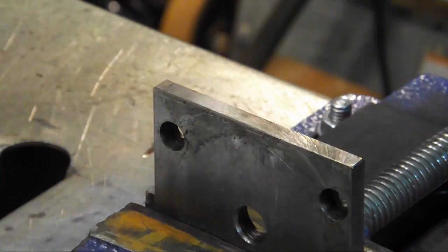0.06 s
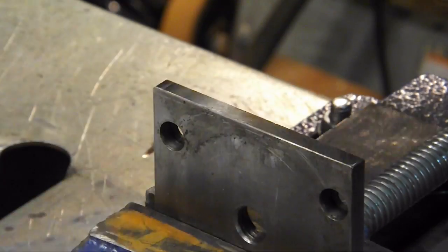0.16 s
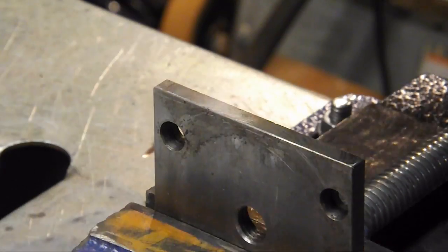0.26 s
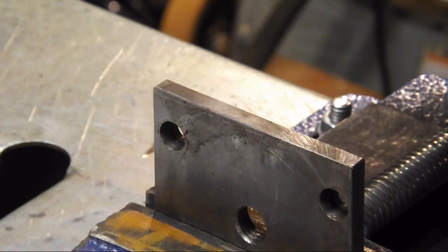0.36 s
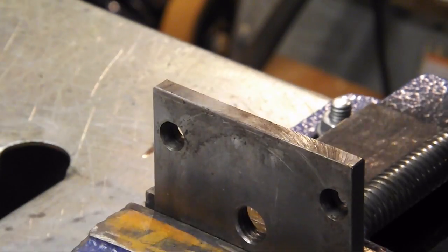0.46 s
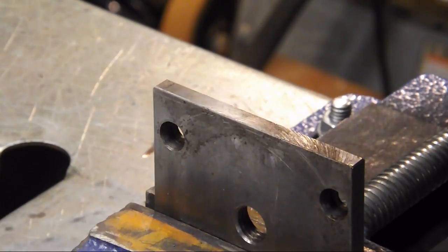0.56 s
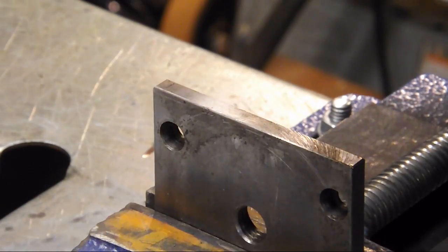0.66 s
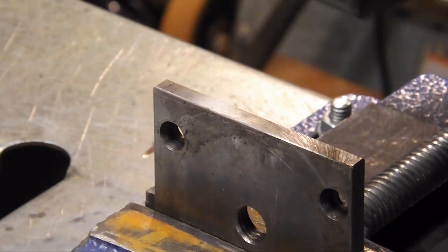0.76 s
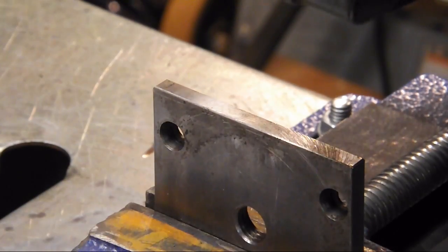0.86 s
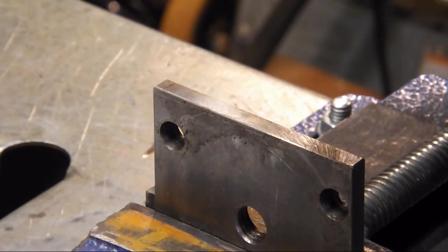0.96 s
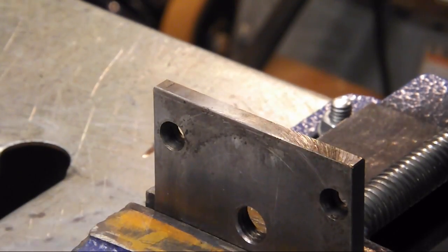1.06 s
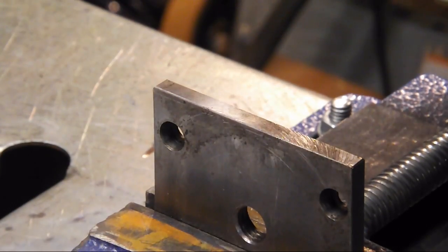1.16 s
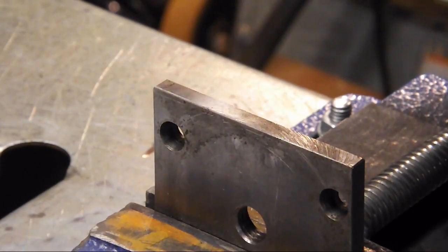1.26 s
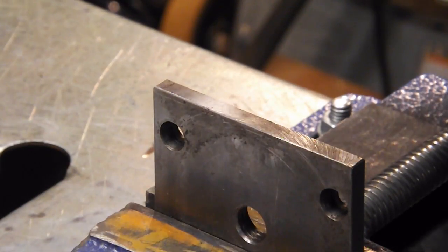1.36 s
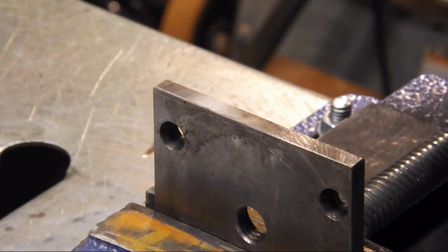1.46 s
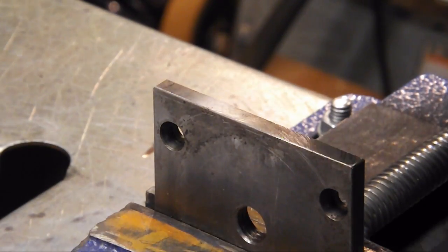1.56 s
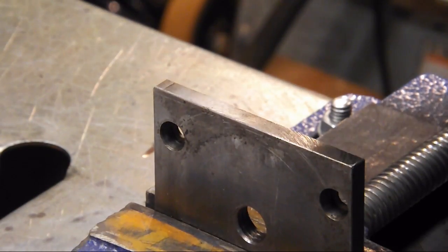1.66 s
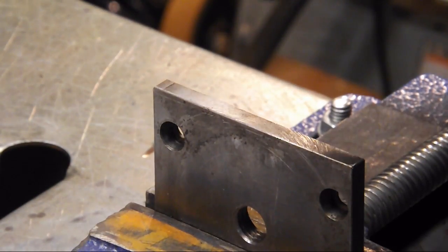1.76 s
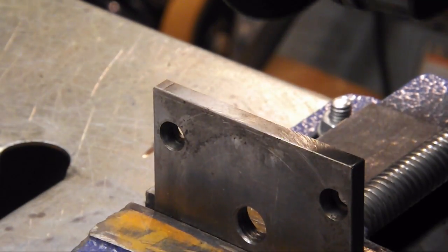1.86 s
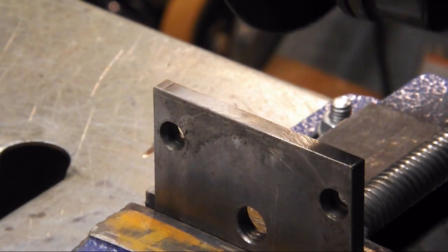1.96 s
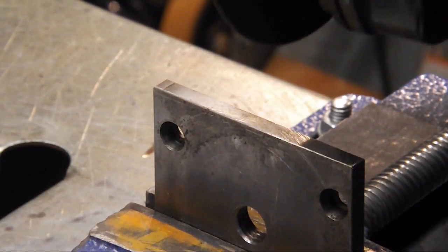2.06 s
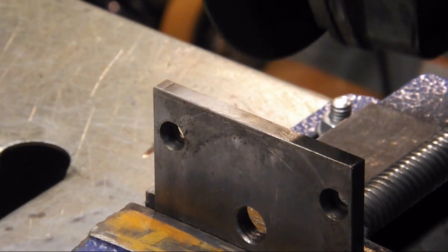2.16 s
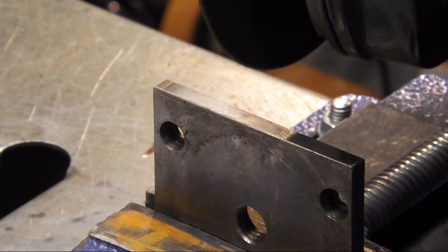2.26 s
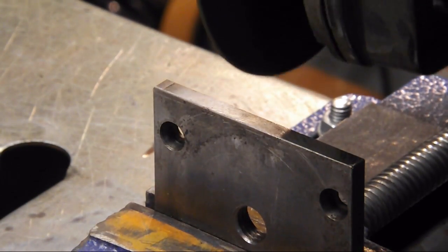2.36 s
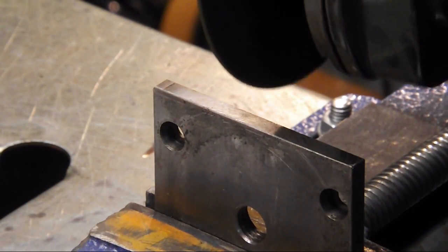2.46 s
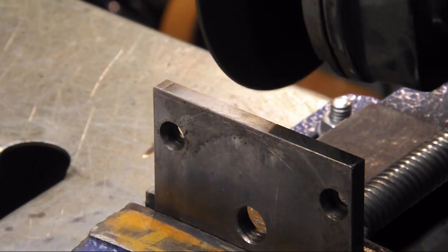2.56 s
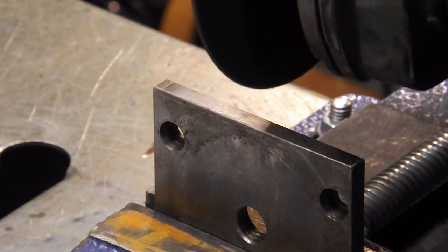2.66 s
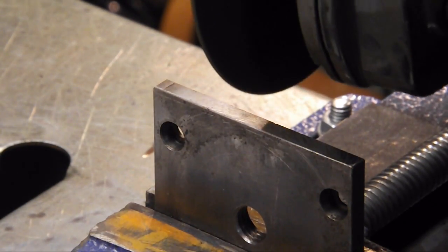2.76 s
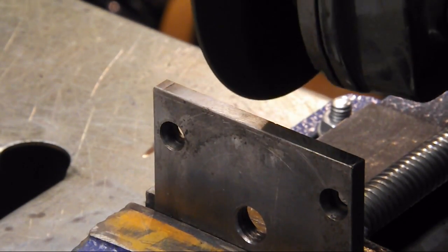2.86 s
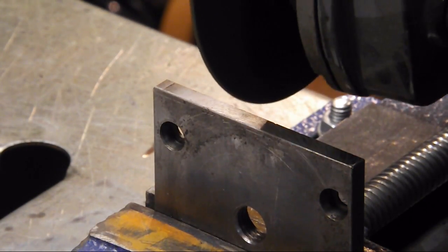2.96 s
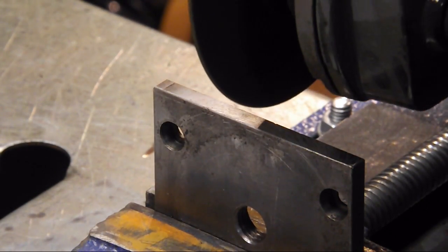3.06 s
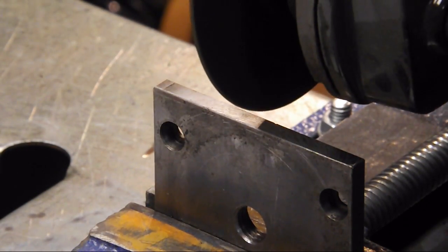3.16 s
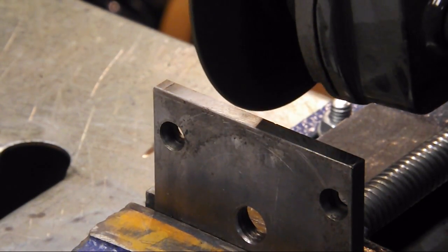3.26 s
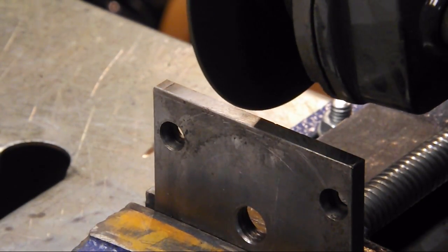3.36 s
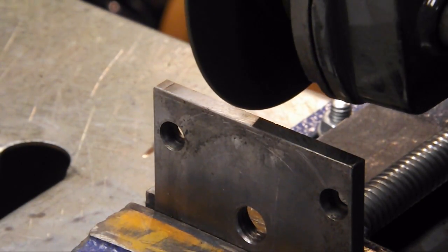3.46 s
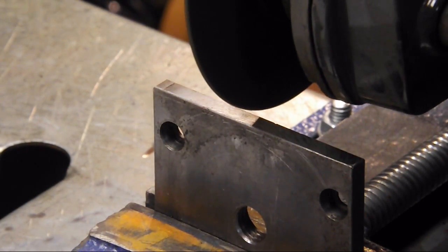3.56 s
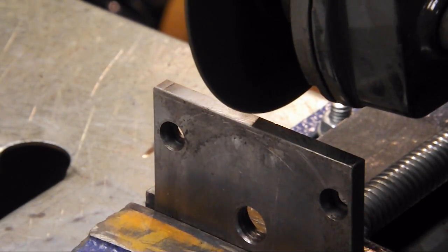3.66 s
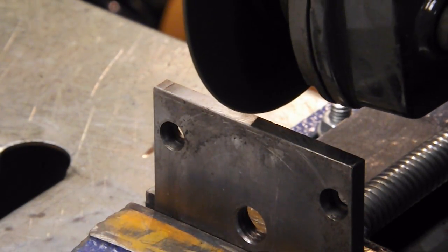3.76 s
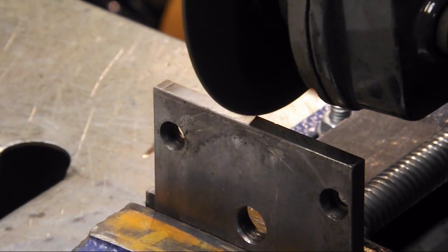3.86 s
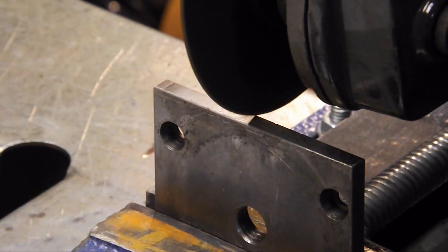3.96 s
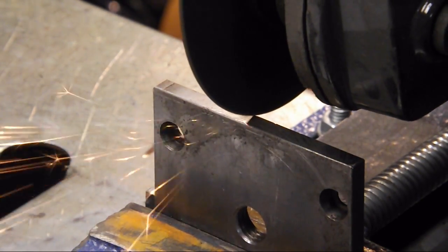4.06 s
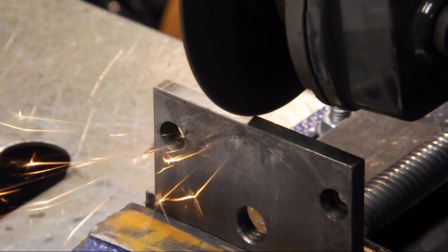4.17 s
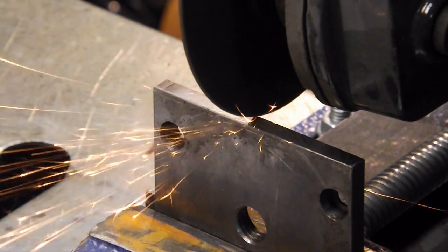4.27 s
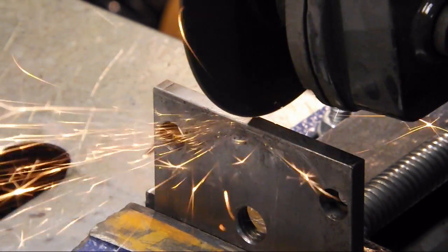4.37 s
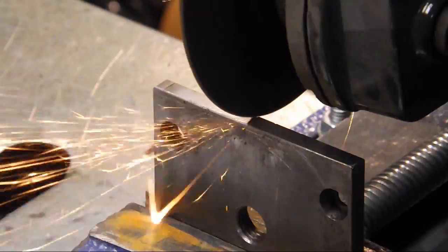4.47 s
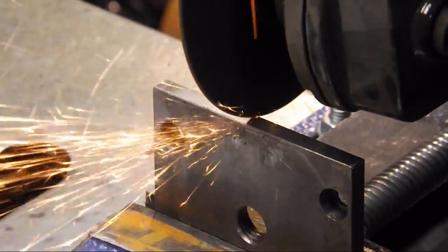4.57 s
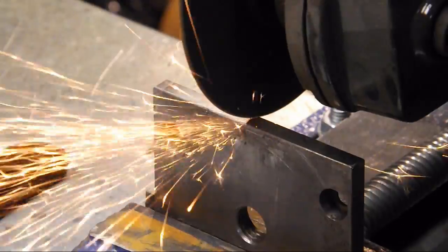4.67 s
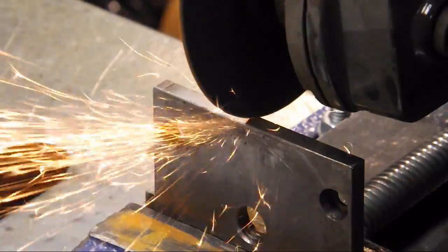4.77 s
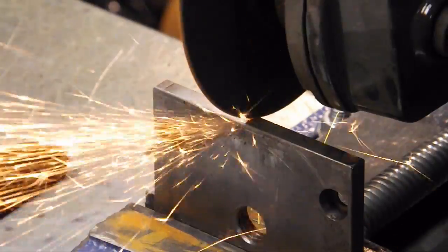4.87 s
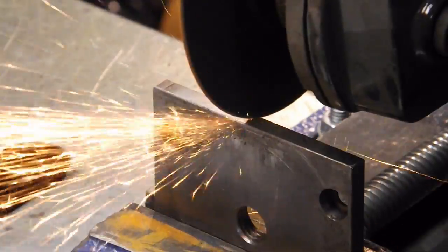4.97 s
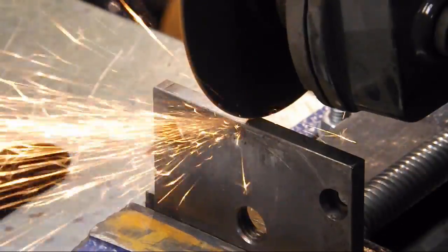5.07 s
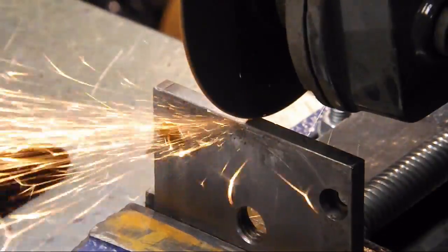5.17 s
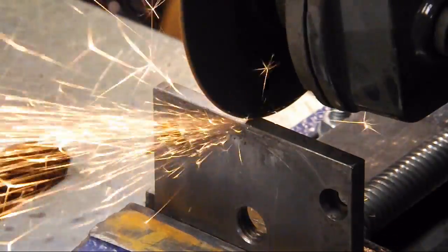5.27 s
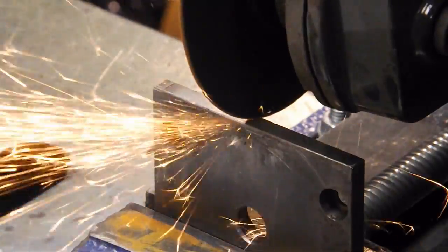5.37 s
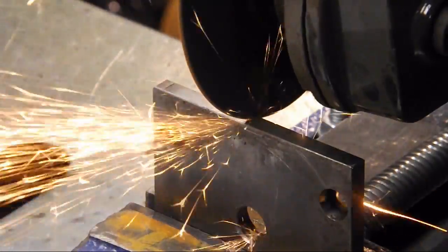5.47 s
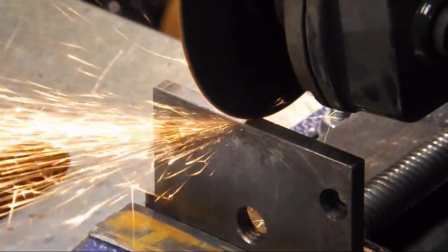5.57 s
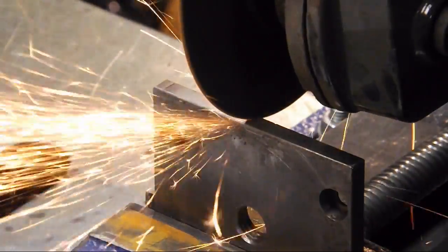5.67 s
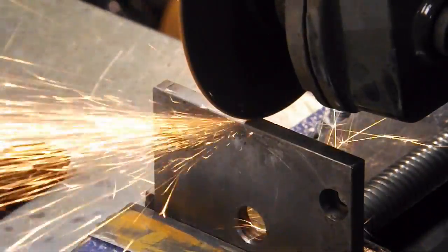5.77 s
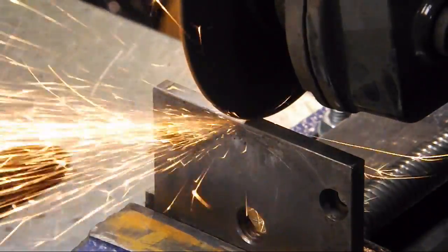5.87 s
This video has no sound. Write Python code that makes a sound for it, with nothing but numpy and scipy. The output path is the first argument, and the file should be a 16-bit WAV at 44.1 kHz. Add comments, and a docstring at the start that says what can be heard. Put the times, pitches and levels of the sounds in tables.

```python
"""Faint switch rattles, then a hand grinder jolts into life and runs up to speed in a workshop.
Loose gear teeth chatter and knock in their housing, the armature whines, cooling air hisses.
The disc bites into a steel plate in a vice: grit rubs, the plate sings, the motor slows.
The start overloads a small, close microphone until its automatic gain has come down."""
import sys
import numpy as np
from scipy import signal
from scipy.fft import rfft, irfft
from scipy.io import wavfile

SR = 44100
rng = np.random.default_rng(int(sys.argv[2]) if len(sys.argv) > 2 else 0)


def wrap_up_sound(samples):
    """Save the sound to the file named by the first command line argument, as 16-bit audio."""
    columns = np.atleast_2d(samples).T
    # keep every value between -1 and 1, then stretch to whole-number steps
    tamed = np.clip(columns, -1, 1)
    steps = np.round(tamed * 32767).astype(np.int16)
    wavfile.write(sys.argv[1], SR, steps)


N = 260631
TIME_S = np.arange(N) / SR
START_S, IDLE_HZ, DISC_PER_ARMATURE = .7985, 461.6, 15 / 49

# Run-up stages: missing_speed_hz, time_constant_s
RUN_UP_STAGES = [(169.9, .2544), (86.85, .6986)]
# Braking by the cut: time_s, lost_speed_hz
SPEED_SAG = [(4.2, 0), (4.5, 6), (4.7, 15.3), (4.85, 23), (5.1, 29), (5.43, 31.5), (5.6, 35), (5.91, 39)]
def armature_speed():
    """Speed climbs in a quick and a slow stage, then sags under the cut."""
    since_s = np.maximum(TIME_S - START_S, 0)
    missing_hz = sum(gap_hz * np.exp(-since_s / lag_s) for gap_hz, lag_s in RUN_UP_STAGES)
    sag_hz = curve(SPEED_SAG)
    return IDLE_HZ - missing_hz - sag_hz, sag_hz


# Gear housing modes: pitch_hz, width_hz, level_db
HOUSING_MODES = [(780, 120, 11), (1410, 49, 3), (2937, 37, 0), (3135, 670, 3), (3146, 120, 0.5),
                 (3414, 22, -10), (4100, 60, -3), (4170, 23, -2.5), (5079, 20, -2), (5090, 72, -8.5)]
def housing(blows, spectrum, ring_db):
    """The gear housing rings briefly after each blow."""
    return colour(blows + from_db(ring_db) * ringing(blows, HOUSING_MODES), spectrum)


# Tooth knock spectrum: frequency_hz, level_db
KNOCK_SPECTRUM = [(200, -70), (900, -40), (2200, -15), (3100, -2), (4100, -3), (4600, -7), (5150, -2),
                  (5350, -21), (9000, -38), (15000, -62)]
TORQUE_PULSE_HZ, KNOCK_RING_DB = 120, 5
def tooth_knocks(push_db):
    """Torque pulses twice per mains cycle and knocks the teeth together, among stray blows."""
    pulse_s = np.arange(.002, N / SR - .01, 1 / TORQUE_PULSE_HZ)
    late_s, size_db = (rng.standard_normal((len(pulse_s), 2)) * [.0012, 4.5]).T
    blows = .5 * random_blows(per_s=150, spread_db=4.7, push_db=push_db)
    blows[((pulse_s + np.abs(late_s)) * SR).astype(int)] = from_db(np.minimum(size_db, 8))
    return unit_rms(housing(blows, KNOCK_SPECTRUM, KNOCK_RING_DB))


# Tool level as the hand moves it: time_s, level_db
TOOL_LEVEL = [(0.87, -12), (0.9, -17), (1.37, -18), (1.44, -15.5), (1.49, -20), (1.61, -19.5),
              (1.64, -22.5), (1.71, -18.5), (1.98, -20), (1.99, -26), (2.13, -18.5), (2.3, -23),
              (2.45, -18.5), (2.53, -24), (2.62, -18), (3.48, -22.5), (3.69, -18.5), (4.21, -23),
              (4.42, -17.5), (4.62, -21.5), (4.69, -17), (4.81, -21.5), (4.91, -16), (5.04, -21),
              (5.15, -16), (5.33, -20.5), (5.45, -14), (5.46, -20), (5.87, -16.5), (5.91, -21)]
# Tooth chatter spectrum: frequency_hz, level_db
CHATTER_SPECTRUM = [(1000, -43), (1700, -15.5), (2170, -16), (3050, 2.5), (3800, -7.5), (4500, -12.5),
                    (5150, -9.5), (5300, -36), (6030, -15.5), (8840, -38), (10800, -16.5), (15000, -61)]
def gears(disc_turns, speed_decades, sag_hz):
    """Loose teeth chatter; knocks grow with speed and soften as the cut takes up the play."""
    torque_db = 3.5 * np.sin(2 * np.pi * TORQUE_PULSE_HZ * TIME_S)
    runout_db = 2.5 * np.sin(2 * np.pi * disc_turns)
    push_db = torque_db + runout_db
    blows = random_blows(per_s=5000, spread_db=.94, push_db=push_db + 2 * drift(28))
    chatter = unit_rms(housing(blows, CHATTER_SPECTRUM, ring_db=16))
    knocks = from_db(-1 + 22 * speed_decades - .3 * sag_hz) * tooth_knocks(push_db)
    return from_db(curve(TOOL_LEVEL)) * unit_rms(chatter + knocks)


# Hard tooth blows: start_s, level_db
HARD_BLOWS = [(0.9447, -2), (0.9831, -5), (1.0844, -5), (1.2081, -4), (1.2679, -1), (1.3922, -3),
              (1.4246, -3), (1.4421, -2), (1.46, -1), (1.5767, 0), (1.7683, -4), (1.7997, -5), (1.8092, -2),
              (1.8416, -2), (1.908, -3), (1.9514, -3), (1.9748, -2), (2.0192, -4), (2.1011, -6),
              (2.1914, -7), (2.2098, 0), (2.4133, 0), (2.4413, -2), (2.4996, -3), (2.6019, -3), (3.002, -3),
              (3.0594, 0), (3.1592, -1), (3.3158, -2), (3.3572, -6), (3.3727, -2), (3.4505, -3),
              (3.5927, -1), (3.6575, -2), (3.7493, 1), (3.8616, -3), (4.0332, -1), (4.1185, -1),
              (4.1753, -2), (4.4218, -2)]
def clacks():
    """Single hard blows on the housing, each with a quick, weaker rebound."""
    start_s, level_db = np.transpose(HARD_BLOWS)
    rebound_s = start_s + rng.uniform(.0006, .0016, len(start_s))
    blows = np.zeros(N)
    blows[(start_s * SR).astype(int)] = from_db(level_db)
    blows[(rebound_s * SR).astype(int)] = from_db(level_db - 6)
    peak = np.abs(housing(signal.unit_impulse(N), KNOCK_SPECTRUM, KNOCK_RING_DB)).max()
    return housing(blows, KNOCK_SPECTRUM, KNOCK_RING_DB) / (1.45 * peak)  # blow and rebound add up


# Unbalance, slots, pinion, commutator, third slot harmonic, hum overtone: cycles_per_turn
ARMATURE_ORDERS = (1, 13, 15, 26, 39, 4)
# Radiation curve for each order: pitch_hz, level_db
WHINE_RADIATION = [
    [(311, -59), (385, -59.5), (405, -46), (418, -36), (425, -42), (431, -56.5), (439, -42.5), (461, -40)],
    [(4040, -45), (4950, -50), (5150, -31), (5400, -34), (5590, -41), (5615, -31), (5760, -36), (5830, -29),
     (5922, -30), (5930, -38), (5990, -34)],
    [(4700, -52), (5500, -63), (6100, -48), (6500, -43), (6750, -52), (6880, -39.5), (6915, -54)],
    [(8000, -62), (9400, -52), (10050, -45), (10500, -52), (11100, -47), (11400, -51), (11700, -45),
     (11900, -51), (12000, -58)],
    [(11300, -75), (13100, -62), (15400, -58), (15700, -90)],
    [(1300, -65), (1550, -42), (1700, -57), (1800, -51), (1845, -60)],
]
def armature_whine(turns, speed_hz, speed_decades, sag_hz):
    """Tones locked to the armature swell and fade as their pitch moves."""
    levels_db = [np.interp(order * speed_hz, *np.transpose(radiation))
                 for order, radiation in zip(ARMATURE_ORDERS, WHINE_RADIATION)]
    levels_db[1] -= .7 * sag_hz  # slot whine sinks under load
    whine = shaft_tones(turns, ARMATURE_ORDERS, levels_db, waver_db=1.46)
    hum_db = [idle_db + 200 * speed_decades for idle_db in (-52, -54)]
    hum = shaft_tones(turns, (2, 3), hum_db, waver_db=4.2)
    return fade_in(START_S, rise_s=.1) * (whine + hum)


# Jolt spectrum: frequency_hz, level_db
JOLT_SPECTRUM = [(30, -74), (70, -21), (100, 4), (250, -31), (600, -4), (1500, -5), (2200, 4.5),
                 (4000, -23), (12000, -28.5)]
def start_jolt():
    """The tool jerks in the hand as torque sets in; the low part dies sooner."""
    noise = unit_rms(coloured_noise(JOLT_SPECTRUM))
    low = butterworth(noise, 2, 2600, "low")
    return from_db(-17) * (decay(START_S, t60_s=.15) * low + decay(START_S, t60_s=.36) * (noise - low))


def guard_ring(fade_db=17, fade_s=.75):
    """The disc guard sings during the run-up, then fades to a lower level."""
    since_s = np.maximum(TIME_S - START_S, 0)
    ring = unit_rms(ringing(rng.standard_normal(N), [(4150, 90, 0)]))
    return from_db(-18 - fade_db * (1 - np.exp(-(since_s / fade_s) ** 2))) * ring


# Disc pressure, as grinding level in 7-11 kHz: time_s, level_db
CUT_LEVEL = [(4.2, -40.5), (4.4, -33.5), (4.646, -32.5), (4.676, -28.5), (4.842, -34.5), (4.938, -30.5),
             (5.338, -33), (5.532, -31.5), (5.566, -33.5), (5.856, -33.5), (5.886, -40), (5.91, -35)]
# Grit on steel: frequency_hz, level_db
GRIT_SPECTRUM = [(150, -71), (500, -66), (1500, -3), (3000, 11.5), (5000, -10.5), (7000, -1.5),
                 (10000, -23.5), (12000, -17), (15500, -43)]
# Plate and disc modes: pitch_hz, width_hz, level_db
PLATE_MODES = [(1830, 170, -10), (2985, 335, -3), (4070, 200, -12), (4770, 146, -2), (5220, 260, -9.5),
               (5830, 150, -11.5), (6580, 49, -6), (7200, 250, -20.5), (8050, 150, -12), (9800, 210, -15.5),
               (12100, 200, -45), (11500, 350, -48)]
def grinding(disc_turns, wear_s=.25, nominal_disc_hz=135, grains=320, throb_db=8):
    """The same grit passes the steel on every turn and wears slowly, so the noise nearly repeats."""
    kept = np.exp(-1 / (wear_s * nominal_disc_hz))
    new_grit = rng.standard_normal((int(disc_turns[-1]) + 2, grains))
    grit = signal.lfilter([np.sqrt(1 - kept ** 2)], [1, -kept], new_grit, axis=0).ravel()
    rub = grit[(disc_turns * grains).astype(int)] + .35 * rng.standard_normal(N)
    uneven_rim = np.sin(2 * np.pi * disc_turns) + .99 * np.sin(4 * np.pi * disc_turns + .78)
    rub *= from_db(throb_db * uneven_rim)
    sound = colour(rub, GRIT_SPECTRUM) + from_db(21) * ringing(rub, PLATE_MODES)
    return from_db(curve(CUT_LEVEL)) * unit_band_rms(sound, 7000, 11000)


# Disc orders that the plate favours: cycles_per_turn
RIM_ORDERS = (2, 8, 9, 15, 23, 31, 36, 38, 41, 44, 61)
# Level of each order: steady_db, swell_at_s, swell_db, swell_width_s
RIM_SWELLS = [(-64, 5.5, 11, .5), (-47, 4.72, 12, .17), (-44, 5.2, 4, .3), (-41, 4.55, 7, .2),
              (-33, 5.2, 9, .4), (-42, 5.6, 15, .2), (-35, 5.2, 6, .5), (-36, 4.7, 10, .12),
              (-42, 5.35, 8, .25), (-43, 5.2, 8, .3), (-50, 5.45, 13, .25)]
def plate_song(disc_turns):
    """Ridges on the rim make the plate sing; each order swells once."""
    levels_db = [steady_db + swell_db * np.exp(-((TIME_S - at_s) / width_s) ** 2)
                 for steady_db, at_s, swell_db, width_s in RIM_SWELLS]
    return shaft_tones(disc_turns, RIM_ORDERS, levels_db, waver_db=1.5)


# Cooling air spectrum: frequency_hz, level_db
AIR_SPECTRUM = [(59, -78), (100, -38), (367, -29.5), (434, -26.5), (502, -23.5), (1920, -13), (3050, -7),
                (9860, -30), (12400, -31), (14100, -39), (15000, -107)]
def cooling_air(speed_decades):
    """The rush of air grows with speed and follows the tool's movement in the hand."""
    tool_db = curve(TOOL_LEVEL)
    level_db = -35 + 79 * speed_decades + tool_db - np.median(tool_db)
    return from_db(level_db) * unit_band_rms(coloured_noise(AIR_SPECTRUM), 600, 1800)


# Fingers on the switch: start_s, level_db, t60_s
SWITCH_TOUCHES = [(.002, -48, 0.14), (0.235, -48, 0.22), (.630, -40, 0.036), (0.638, -47.5, 0.1),
                  (0.793, -33, 0.047)]
def switch():
    """Short dying rattles of the plastic slider."""
    plastic = [(800, -39), (2500, -9.5), (3300, 3.5), (5000, -22), (10000, -31), (13000, -36)]
    envelope = sum(from_db(db) * decay(start_s, t60_s) for start_s, db, t60_s in SWITCH_TOUCHES)
    return envelope * unit_rms(coloured_noise(plastic))


def room(sound, t60_s=.15, gap_s=.004):
    """Reflections arrive after a short gap as a dying noise tail."""
    t = np.arange(int(.5 * SR)) / SR
    tail = rng.standard_normal(len(t)) * from_db(-60 * t / t60_s) * (t > gap_s)
    return signal.fftconvolve(sound, tail / np.linalg.norm(tail))[:N]


# Workshop background: frequency_hz, level_db
SHOP_SPECTRUM = [(15, -15), (25, -0.5), (140, -17), (173, -18), (246, -19), (537, -29.5), (970, -26),
                 (1200, -30.5), (1710, -28.5), (2360, -24), (3530, -14.5), (6550, -39), (10600, -41),
                 (11500, -43.5), (15500, -44)]
# Distant whines: pitch_hz, width_hz, level_db
DISTANT_WHINES = [(1675, 83, 13), (3540, 350, 4.5), (11900, 30, 15)]
def workshop():
    """Distant machines and rumble; a little rumble differs between the microphone ports."""
    noise = rng.standard_normal(N)
    machines = unit_rms(colour(noise + ringing(noise, DISTANT_WHINES), SHOP_SPECTRUM, size=16384))
    rumble_spectrum = SHOP_SPECTRUM[:6] + [(2000, -60)]
    port_rumble = np.array([unit_rms(coloured_noise(rumble_spectrum)) for _ in range(2)])
    return (machines + from_db(-22) * port_rumble) * from_db(-60 + drift(23))


def from_db(db):
    return 10 ** (np.asarray(db) / 20)


def unit_rms(x):
    return x / np.sqrt(np.mean(x ** 2) + 1e-20)


def butterworth(x, order, edge_hz, kind):
    return signal.sosfilt(signal.butter(order, edge_hz, kind, fs=SR, output="sos"), x)


def unit_band_rms(x, low_hz, high_hz):
    return x / np.std(butterworth(x, 4, [low_hz, high_hz], "band"))


def curve(rows):
    """Rows of time_s, value, interpolated to every sample."""
    return np.interp(TIME_S, *np.transpose(rows))


def fade_in(start_s, rise_s):
    return np.clip((TIME_S - start_s) / rise_s, 0, 1)


def decay(start_s, t60_s):
    return (TIME_S >= start_s) * from_db(-60 * np.maximum(TIME_S - start_s, 0) / t60_s)


def drift(rate_hz):
    """Slow random wander, rms about 1."""
    pole = np.exp(-2 * np.pi * rate_hz / SR)
    return unit_rms(signal.lfilter([1], [1, -2 * pole, pole * pole], rng.standard_normal(N + SR)))[SR:]


def colour(x, spectrum, size=4096):
    """Minimum-phase filter from rows of frequency_hz, level_db."""
    hz, db = np.transpose(spectrum)
    grid_hz = np.maximum(np.arange(size // 2 + 1) * SR / size, 1)
    gain = from_db(np.interp(np.log(grid_hz), np.log(hz), db))
    cepstrum = irfft(np.log(gain))
    cepstrum[1:size // 2] *= 2
    cepstrum[size // 2 + 1:] = 0
    return signal.fftconvolve(x, irfft(np.exp(rfft(cepstrum))))[:N]


def coloured_noise(spectrum):
    return colour(rng.standard_normal(N), spectrum)


def ringing(x, modes):
    """Parallel resonances from rows of pitch_hz, width_hz, level_db; signs alternate."""
    out = 0
    for k, (pitch_hz, width_hz, level_db) in enumerate(modes):
        r = np.exp(-np.pi * width_hz / SR)
        feedforward = [(1 - r * r) / 2, 0, (r * r - 1) / 2]
        feedback = [1, -2 * r * np.cos(2 * np.pi * pitch_hz / SR), r * r]
        out += (-1) ** k * from_db(level_db) * signal.lfilter(feedforward, feedback, x)
    return out


def shaft_tones(turns, orders, levels_db, waver_db):
    """Sines locked to a shaft, each wavering in level."""
    return sum(np.sqrt(2) * from_db(db + waver_db * drift(12)) * np.sin(2 * np.pi * order * turns)
               for order, db in zip(orders, levels_db))


def random_blows(per_s, spread_db, push_db):
    """Impulses of uneven size; a push makes them harder."""
    sizes = from_db(spread_db * np.minimum(rng.exponential(1, N), 3.5) + push_db)
    return sizes * rng.choice([-1, 1], N) * (rng.random(N) < per_s / SR)


def dull_when_slow(x, speed_hz, split_hz=8030, flat_at_speed_hz=590):
    """Slow teeth and slow air make little treble."""
    treble_db = 73 * np.log10(speed_hz / flat_at_speed_hz)
    return butterworth(x, 4, split_hz, "low") + from_db(treble_db) * butterworth(x, 4, split_hz, "high")


def scene():
    """Grinder and cut in the workshop, at two microphone ports."""
    speed_hz, sag_hz = armature_speed()
    speed_decades = np.log10(speed_hz / IDLE_HZ)
    turns = np.cumsum(speed_hz) / SR
    disc_turns = turns * DISC_PER_ARMATURE
    contact = fade_in(CUT_LEVEL[0][0], rise_s=.086)
    running = cooling_air(speed_decades) + gears(disc_turns, speed_decades, sag_hz)
    tool = (TIME_S > START_S) * (dull_when_slow(running, speed_hz) + start_jolt() + guard_ring())
    tool += clacks() + contact * grinding(disc_turns) + switch()
    tones = armature_whine(turns, speed_hz, speed_decades, sag_hz) + contact * plate_song(disc_turns)
    ports = tool + from_db(-7) * room(tool) + tones + workshop()
    ports[0, 1:] = ports[0, :-1].copy()  # left port is one sample farther away
    return ports + from_db(-95) * rng.standard_normal((2, N))


def record(dry, boost_db=16, target_db=-19, delay_s=.033, smooth_s=.023, recovery_db_per_s=3):
    """Automatic gain lifts quiet sound and reacts late, so the start clips; the top treble is cut."""
    power = signal.lfilter([.005], [1, -.995], np.mean(dry ** 2, axis=0))
    level_db = 10 * np.log10(power + 1e-12)
    recovery_db = recovery_db_per_s * TIME_S
    held_db = np.maximum.accumulate(level_db + recovery_db) - recovery_db
    duck_db = np.clip(target_db - held_db, 0, boost_db) - boost_db
    late_db = np.concatenate([np.zeros(int(delay_s * SR)), duck_db])[:N]
    pole = np.exp(-1 / (smooth_s * SR))
    gain = from_db(boost_db + signal.lfilter([1 - pole], [1, -pole], late_db))
    clipped = np.clip(dry * gain, -.95, .95)
    coupled = butterworth(clipped, 2, 30, "high")  # coupling capacitor
    return signal.sosfilt(signal.cheby2(12, 70, 15800, fs=SR, output="sos"), coupled)


dry = scene()
out = record(dry)
wrap_up_sound(out)
```